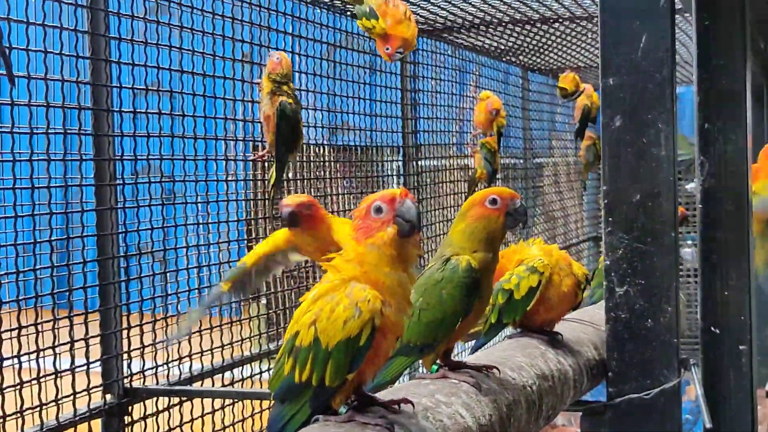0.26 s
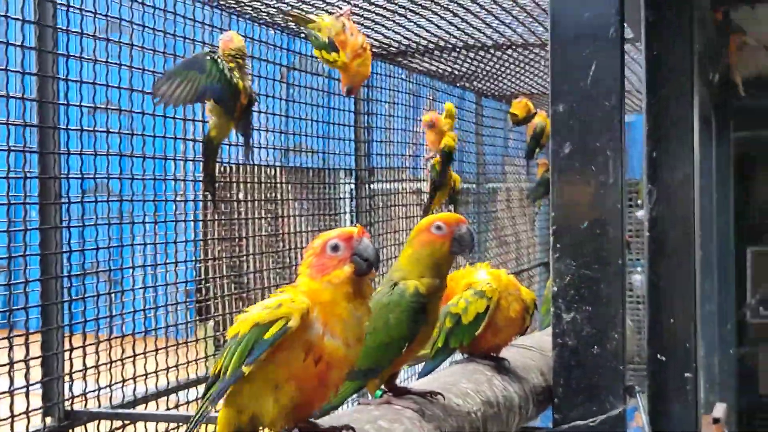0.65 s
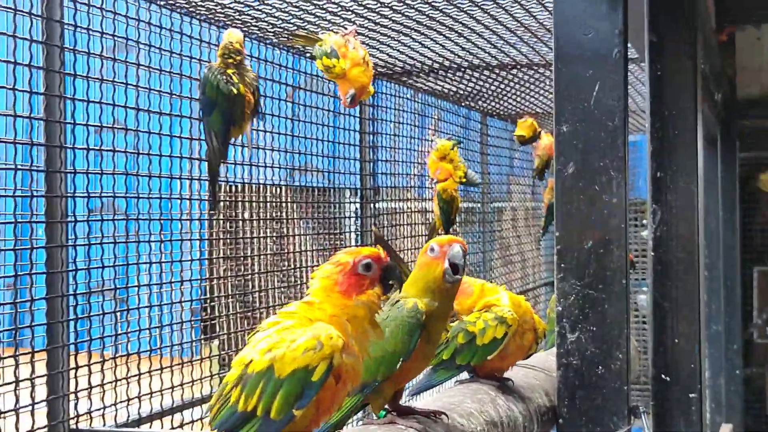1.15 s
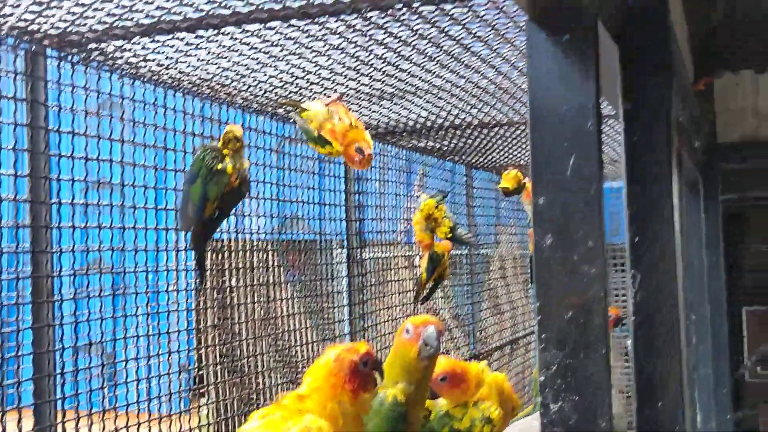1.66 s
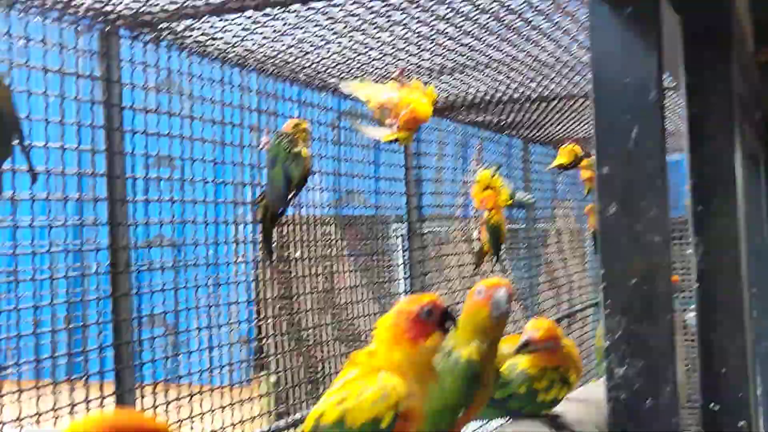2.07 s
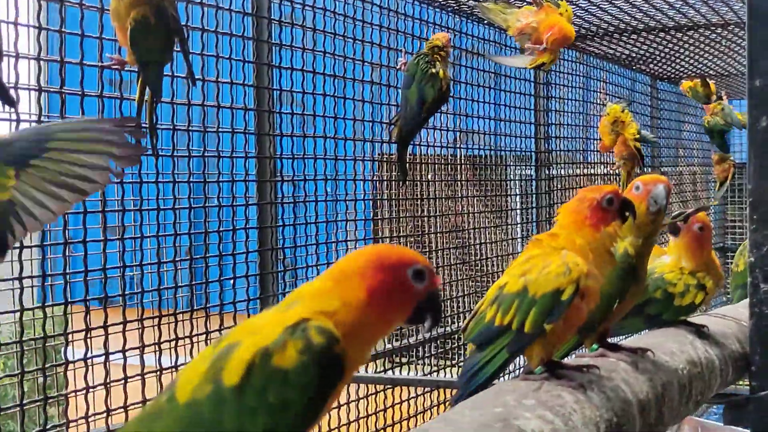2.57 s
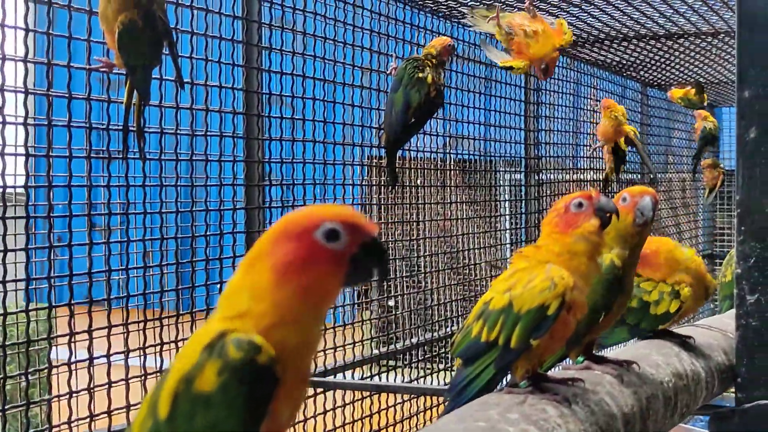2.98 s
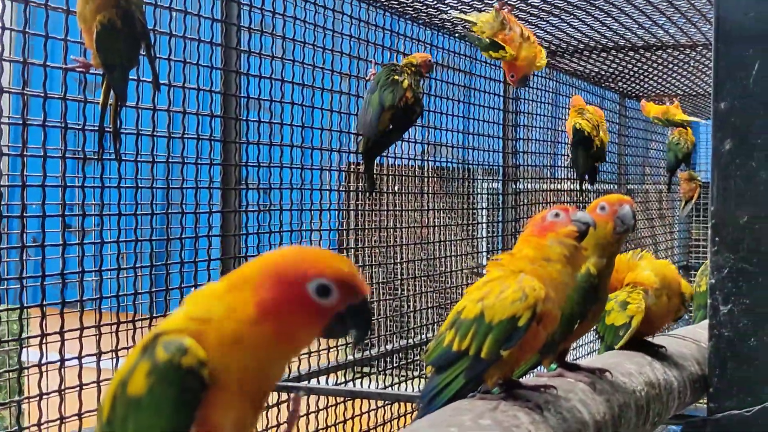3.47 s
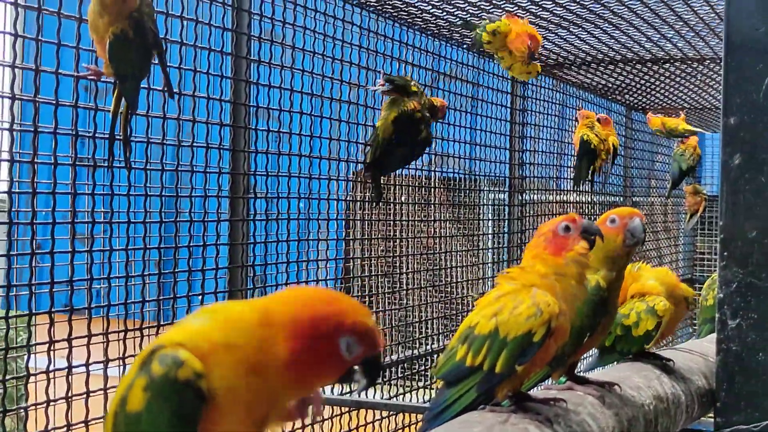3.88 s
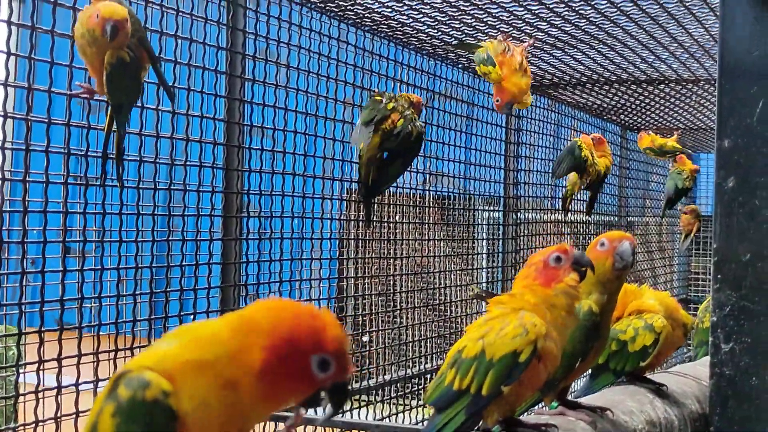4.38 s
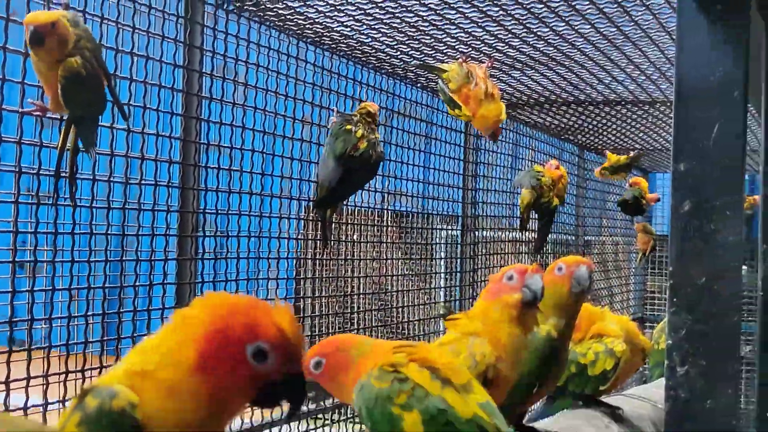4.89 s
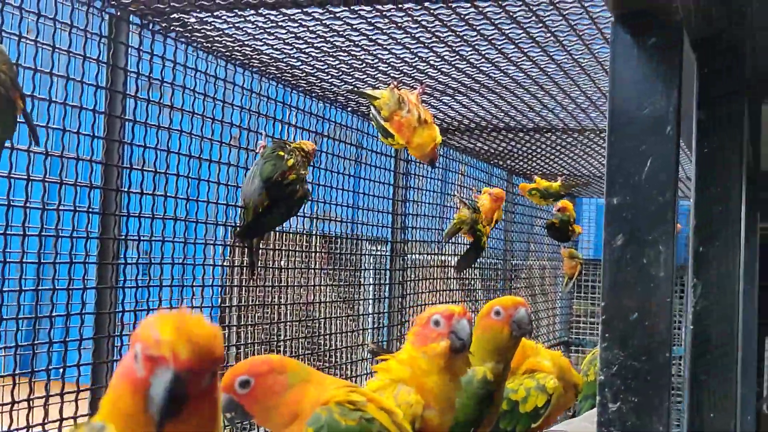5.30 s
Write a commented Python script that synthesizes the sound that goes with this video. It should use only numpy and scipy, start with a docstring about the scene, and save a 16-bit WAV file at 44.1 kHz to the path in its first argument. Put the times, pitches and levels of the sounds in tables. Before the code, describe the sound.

A flock of small parrots screeches shrilly in an outdoor wire aviary, near and far calls overlapping, with dull knocks close to the microphone.

```python
"""An outdoor wire-mesh aviary of small parrots: a low rush and the blurred calls of the far flock run throughout.
Hoarse squawks, so rough their harmonics nearly drown, come from mid-aviary; an early close yelp slides downward.
From half a second on, near and far birds screech: shrill harmonics, trilled and rasped, the far ones more echoed.
Dull knocks, damped low rings with a thud of noise, land by the left microphone port from 1.4 to 2.2 s.
A close, stuttering croak comes near the end; the recorder's limiter ducks the loudest sounds."""
import sys
import numpy as np
from scipy import signal
from scipy.fft import rfft, irfft, next_fast_len
from scipy.io import wavfile
from scipy.ndimage import uniform_filter1d, map_coordinates

SR = 44100
rng = np.random.default_rng(int(sys.argv[2]) if len(sys.argv) > 2 else 0)


def store_pcm(level_fs):
    """Save levels as 16-bit WAV."""
    pcm = np.round(np.clip(level_fs, -1, 1) * 32767).astype(np.int16)
    wavfile.write(sys.argv[1], SR, np.atleast_2d(pcm).T)


N = 244314
TOP_HZ = 15900  # upper band limit of harmonics and recorder
CLEAR_RASP = .2  # rasp of the yelp and the croak, 0-1


def amp(db):
    """Decibels to gain."""
    return 10 ** (np.asarray(db) / 20)


def unit(x):
    """Scale to rms 1."""
    return x / np.sqrt(np.mean(x ** 2) + 1e-20)


def along(points, hz):
    """Read (frequency [Hz], value) points on a log frequency axis."""
    f, v = np.transpose(points)
    return np.interp(np.log(np.abs(hz) + 1), np.log(f + 1), v)


def wobble(rate, size):
    """A smooth random curve through rate knots a second."""
    knots = rng.standard_normal(size=512)
    return map_coordinates(knots, [np.arange(size) * rate / SR], mode="mirror")


def filtered(x, gain):
    """Apply a gain that depends on frequency."""
    size = x.shape[-1]
    padded = next_fast_len(size + 4096)
    return irfft(rfft(x, padded) * gain(np.fft.rfftfreq(padded, 1 / SR)), padded)[..., :size]


def noise(spectrum, shape):
    """Noise of rms 1 with the given colour."""
    return unit(filtered(rng.standard_normal(shape), lambda hz: amp(along(spectrum, hz))))


def add(track, s, sound):
    """Mix a sound into the track at time s."""
    start = int(np.clip(s * SR, 0, N))
    part = sound[..., :N - start]
    track[:, start:start + part.shape[-1]] += part


def bow(length):
    """The rounded rise and fall of a short syllable."""
    return np.sqrt(np.sin(np.linspace(0, np.pi, int(length * SR))).clip(0))


# how long the aviary walls ring: (frequency [Hz], time to fall 60 dB [s])
WALL_DECAY = [(300, 0.14), (2000, 0.73), (6000, 0.53), (10000, 0.31), (15000, 0.31)]
WET_M = 1.42  # distance at which the echoes are as loud as the direct sound


def in_aviary(voice, metres, pan_db, early_db=1, early_t60=0.27, lead_per_db=1.07):
    """A bird heard at the two ports: direct sound, quick echoes off the frame and a tail from the walls."""
    hz, t, grains = signal.stft(rng.standard_normal((2, SR // 2)), SR, nperseg=256)
    walls = amp(-60 * t / along(WALL_DECAY, hz)[:, None])
    frame = amp(early_db - 60 * t / early_t60)
    tail = signal.istft(grains * (walls + frame), SR, nperseg=256)[1]
    side = np.array([[pan_db / 2], [-pan_db / 2]])
    wet = metres / WET_M
    # the louder port is also the nearer one and hears the bird slightly earlier
    lead = np.clip(lead_per_db * side, -16, 16)  # samples
    direct = np.sinc(np.arange(tail.shape[1]) - 20 + lead)
    # distance shifts the balance towards the echoes, not the overall level
    response = (direct + wet * tail / np.linalg.norm(tail[0])) * amp(side) / np.hypot(1, wet)
    return signal.fftconvolve(voice[None], response, axes=1)


def syrinx(pitch, rasp, colour, jitter=0.0408, jitter_hz=1000, flutter=1.0, flutter_hz=330,
           split=0.98, undertone=0.62, hiss=0.28, count=8):
    """Harmonics of the membranes; rasp jitters the cycles, makes alternate ones unequal and adds turbulence."""
    size = len(pitch)
    phase = 2 * np.pi * np.cumsum(pitch * (1 + jitter * rasp * wobble(jitter_hz, size))) / SR
    tone = np.zeros(size)
    for k in range(1, count + 1):
        # irregular flutter widens every harmonic into a band
        flicker = wobble(flutter_hz, size) + 1j * wobble(flutter_hz, size)
        shake = 1 + flutter * rasp * flicker / 2 ** .5
        partial = np.real(shake * np.exp(1j * (k * phase + rng.uniform(0, 2 * np.pi))))
        tone += amp(colour(k * pitch)) * (k * pitch < TOP_HZ) * partial
    tone = unit(tone)
    # period doubling puts bands halfway between the harmonics, strongest just above the fundamental
    halves = split * tone * np.cos(phase / 2) + undertone * np.cos(phase + phase / 2)
    rough = halves * wobble(374.1, size)
    breath = rng.standard_normal(SR // 2)[:size]
    air = hiss * unit(filtered(breath, lambda hz: amp(colour(hz))))
    rasping = filtered(rough + air, lambda hz: 1 / (1 + (2500 / (hz + 1)) ** 4))  # mostly above 2500 Hz
    return unit(tone + rasp * rasping)


# relative strength of a harmonic in screeches, squawks and far calls: (frequency [Hz], level [dB])
CALL_THROAT = [(1200, -6), (2000, -3), (3000, 0.5), (4100, 1), (5000, 2), (5900, 4.5), (6800, 1.5),
               (8200, -3.5), (9700, -7.5), (11000, -14), (12500, -19.5), (15500, -17)]
SOFT_DB, FORCEFUL_DB = -24.5, -9.5  # call levels between which force grows from 0 to 1
# each pair runs from a soft call to a forceful one
SWELL_S, TRILL_DEPTH, EDGE_DB = (0.024, 0.007), (0.706, 1), (0.5, 6)
# full pitch range of a trill cycle; loudness swing either way, both at trill depth 1
TRILL_HZ, TRILL_OCTAVES, THROB_DB = 66.3, .16, 5.5
LEAD_S, LEAD_DB, LEAD_OCTAVES = .025, -19.5, .3  # the hoarse rising note that opens a call
SCOOP_OCTAVES, SCOOP_S, SAG_OCTAVES_PER_S = .34, .007, 0.395
DROOP_OCTAVES, DROOP_S, RELEASE_S = 0.276, .009, 0.01
EDGE_RASP = 0.44  # extra rasp at both ends of a call


def call(length, pitch_hz, db, rasp, shrill_db):
    """A hoarse lead-in, a scoop to pitch, a sagging trill and a droop; force hardens onset and deepens trill."""
    t = np.arange(-LEAD_S, length, 1 / SR)
    force = np.clip((db - SOFT_DB) / (FORCEFUL_DB - SOFT_DB), 0, 1)
    swell_s, trill, edge_db = (soft + force * (hard - soft)
                               for soft, hard in (SWELL_S, TRILL_DEPTH, EDGE_DB))
    lead = np.clip(-t / LEAD_S, 0, 1)
    opening = np.exp(-t.clip(0) / SCOOP_S)
    closing = np.exp((t - length) / DROOP_S)
    # every trill cycle starts low and loud, then climbs as it fades; the trill calms as the call ends
    trill_rate = TRILL_HZ * (1 + .07 * wobble(36.54, len(t))) * (t > 0)
    cycle = (np.cumsum(trill_rate) / SR) % 1
    ramp = trill * uniform_filter1d(cycle - .5, size=110) * (1 - closing)
    arch = SAG_OCTAVES_PER_S * (length / 2 - t)
    arch -= LEAD_OCTAVES * lead + SCOOP_OCTAVES * opening + DROOP_OCTAVES * closing
    octaves = arch + TRILL_OCTAVES * ramp + 0.01354 * wobble(119.45, len(t))
    # a shrill call gathers its energy in the throat's main resonance; force adds a harsh top
    focus = [(2400, -0.85), (4200, -0.68), (5800, -0.1), (6500, -0.47), (8200, -0.44)]
    harsh = [(9500, 0.53), (12000, 0.47)]

    def colour(hz):
        return along(CALL_THROAT, hz) + shrill_db * along(focus, hz) + edge_db * along(harsh, hz)

    voice = syrinx(pitch_hz * 2 ** octaves, rasp + EDGE_RASP * (opening + closing), colour)
    attack = np.maximum(np.clip(t / swell_s, 0, 1) ** .58, amp(LEAD_DB) * (1 - lead) ** .5)
    effort = attack * np.clip((length - t) / RELEASE_S, 0, 1) ** .5
    return amp(db) * effort * unit(voice * amp(-2 * THROB_DB * ramp))


# relative colour of the outdoor rush: (frequency [Hz], density [dB per Hz])
RUSH_COLOUR = [(26, -62), (45, -26), (129, -0.5), (232, -1), (264, 1), (384, -5.5), (463, -3.5),
               (534, -5.5), (644, -9.5), (1110, -18.5), (1400, -22), (1820, -62), (3080, -120)]
RUSH_DB = -41.5  # mean level ahead of the ports


def rush(apart=0.78):
    """A low outdoor rush of coloured noise, partly different at the two ports."""
    shared = noise(RUSH_COLOUR, N)
    separate = noise(RUSH_COLOUR, (2, N))
    return unit(shared + apart * separate) * amp(RUSH_DB + wobble(8.9, N))


# level of single calls at the far end, ahead of aviary and ports: (time [s], level [dB])
FLOCK_LEVEL = [(0, -31.5), (.25, -37.5), (1, -36.5), (1.9, -41.5), (2.4, -40.5), (3.3, -39), (3.7, -36),
               (4.1, -41), (4.6, -35), (5.5, -41.5)]
# relative colour of the din: (frequency [Hz], density [dB per Hz])
DIN_COLOUR = [(400, -16), (900, -5.5), (1500, 1), (2000, 2), (2600, 0.5), (3300, 0), (4100, -1.5),
              (5000, -3), (6100, -4.5), (7200, -6.5), (9500, -13.5), (11500, -18), (15500, -29)]
FLOCK_CALLS_PER_S, FLOCK_HZ, FLOCK_CALL_S, FLOCK_M = 7, 2103, 0.11, 2.4


def far_flock(din_db=-5.5, rasp=0.33, spread_octaves=.08, shrill_db=1, pan_db=0.0):
    """Birds at the far end call at random over the din of the rest, blurred into wavering noise."""
    times, level_db = np.transpose(FLOCK_LEVEL)
    swell_db = np.interp(np.arange(N) / SR, times, level_db) + din_db + 3.2 * wobble(7, N)
    track = amp(swell_db) * noise(DIN_COLOUR, (2, N))
    for k in range(int(FLOCK_CALLS_PER_S * N / SR)):
        late, high, long, side = rng.uniform(-1.1, 1, 4)
        s = (k + late / 2) / FLOCK_CALLS_PER_S
        length = FLOCK_CALL_S * 2 ** (long / 2)
        pitch_hz = FLOCK_HZ * 2 ** (spread_octaves * high)
        voice = call(length, pitch_hz, np.interp(s, times, level_db), rasp, shrill_db)
        add(track, s, in_aviary(voice, FLOCK_M, pan_db + 3 * side))
    return track


# hoarse squawks from mid-aviary, levels ahead of aviary and ports:
# (time [s], length [s], pitch [Hz], level [dB])
SQUAWK_CALLS = [(0.089, 0.065, 2095, -34), (0.264, 0.097, 1745, -25.5), (.439, 0.023, 2050, -20.5),
                (3.163, .12, 2320, -34.5), (3.391, 0.075, 2100, -35), (3.774, 0.055, 1750, -30),
                (3.98, 0.094, 2170, -29), (4.666, 0.068, 1888, -25), (4.878, 0.059, 1770, -27.5),
                (5.217, 0.085, 1740, -34), (5.458, .12, 1934, -24.5)]
SQUAWK_M, SQUAWK_RASP, SQUAWK_SHRILL_DB, SQUAWK_PAN_DB = 2.17, 0.73, -2, 1.5


def squawks():
    """The screeching voice with so much rasp that its harmonics nearly drown."""
    track = np.zeros((2, N))
    for s, length, pitch_hz, db in SQUAWK_CALLS:
        voice = call(length, pitch_hz, db, SQUAWK_RASP, SQUAWK_SHRILL_DB)
        add(track, s - LEAD_S, in_aviary(voice, SQUAWK_M, SQUAWK_PAN_DB))
    return track


# syllables of a yelp that drops into a lower register, levels before the fade:
# (time [s], length [s], mid pitch [Hz], level [dB])
YELP_SYLLABLES = [(0.149, 0.0047, 2600, -13), (0.155, .049, 1660, -17), (0.2032, 0.015, 1387, -20)]
# relative strength of a yelp harmonic: (frequency [Hz], level [dB])
YELP_COLOUR = [(1300, 13), (1700, 4), (2700, 19), (3400, 11), (4600, 0), (6300, -9), (9500, -8),
               (11500, -21), (15500, -25)]
YELP_SAG_OCTAVES_PER_S, YELP_FADE_S = 4.3, 0.048


def yelp():
    """A close bird's clearer, lower cry; each syllable slides down and fades."""
    track = np.zeros((2, N))
    for s, length, pitch_hz, db in YELP_SYLLABLES:
        effort = bow(length)
        t = np.arange(len(effort)) / SR - length / 2
        pitch = pitch_hz * 2 ** (-YELP_SAG_OCTAVES_PER_S * t) * (1 + 0.0216 * wobble(226, len(t)))
        voice = syrinx(pitch, rasp=CLEAR_RASP, colour=lambda hz: along(YELP_COLOUR, hz))
        cry = amp(db) * effort * np.exp(-t / YELP_FADE_S) * voice
        add(track, s, in_aviary(cry, metres=0.26, pan_db=6.0))
    return track


# shrill screeches, levels ahead of aviary and ports; shrillness is weighted by frequency, + pan is left:
# (time [s], length [s], pitch [Hz], level [dB], distance [m], base rasp [0-1], shrillness [dB],
#  left-right [dB])
SCREECH_CALLS = [ (0.476, 0.07, 2073, -21, 0.28, 0, -18, 3.5), (0.631, .12, 2072, -20, 3.4, 0.43, -1, 2),
                 (1.0768, .2, 2039, -12.5, 0.74, 0.2, 10, 2.5),
                 (1.4253, 0.17, 1984, -12, 1.16, 0.21, 9, -2), (1.657, .16, 2035, -24, 2.9, 0.57, -9.5, 1),
                 (2.097, .16, 2014, -20.5, 2.4, 0.34, -3, 1.5),
                 (2.467, 0.15, 2110, -19.5, 3.6, 0.39, 3.5, -1),
                 (2.644, 0.095, 2198, -22.5, 4.5, 0.57, 15, -1.5),
                 (2.7417, 0.091, 2199, -14.5, 0.77, .14, -7, 4),
                 (3.005, 0.13, 2081, -24.5, 2.1, 0.33, 12, 2), (3.27, 0.11, 1700, -28.5, 1.7, 0.5, 10, 2.5),
                 (3.567, 0.083, 2113, -25.5, 2, 0.71, -1, 2.5), (3.813, 0.13, 2125, -21, 4, 0.52, -1, 2.5),
                 (4.069, .15, 2035, -19, 5, 0.24, -5, 0), (4.217, .15, 2031, -21, 3, 0.64, -5, 1.5),
                 (4.39, 0.099, 2067, -16.5, .6, 0.13, 1, 2.5), (5.017, 0.08, 2170, -30, 3.6, 0.24, 9, 5.5),
                 ]


def screeches():
    """Loud, trilled calls; the farther the bird, the more echo the microphone hears."""
    track = np.zeros((2, N))
    for s, length, pitch_hz, db, metres, rasp, shrill_db, pan_db in SCREECH_CALLS:
        voice = call(length, pitch_hz, db, rasp, shrill_db)
        add(track, s - LEAD_S, in_aviary(voice, metres, pan_db))
    return track


# dull knocks, level ahead of the ports: (time [s], level [dB], time to fall 60 dB [s])
KNOCK_HITS = [(1.364, 0.5, 0.041), (1.395, -14, 0.1), (1.446, 4.5, 0.012), (1.466, 6, 0.012),
              (1.575, -1, 0.025), (1.592, 3.5, 0.031), (1.623, -12, 0.022), (2.163, -19, 0.023)]
# ringing of the knocked body: (frequency [Hz], relative level [dB], decay [multiple of the knock's])
BODY_MODES = [(120, -10, 1.2), (262, -1.5, .9), (207, -8.5, 2.6)]
# relative colour of the thud: (frequency [Hz], density [dB per Hz])
THUD_COLOUR = [(18, -44), (30, -10), (256, -0.5), (447, -8), (562, -6.5), (964, -22), (1100, -18.5),
               (1500, -23), (1950, -58), (3300, -120)]


def knocks(thud_db=-4, attack_s=.0015, pan_db=17):
    """Dull bumps next to the left port: a damped low ring and a thud of noise."""
    track = np.zeros((2, N))
    t = np.arange(SR // 6) / SR
    for s, db, t60 in KNOCK_HITS:
        ring = sum(amp(mode_db - 60 * t / (t60 * life)) * np.sin(2 * np.pi * hz * t)
                   for hz, mode_db, life in BODY_MODES)
        thud = amp(thud_db - 60 * t / t60) * noise(THUD_COLOUR, (2, len(t)))
        attack = 1 - np.exp(-t / attack_s)
        add(track, s, amp(db) * (ring + thud) * attack * amp([[0], [-pan_db]]))
    return track


# relative strength of a croak harmonic: (frequency [Hz], level [dB])
CROAK_COLOUR = [(1400, -11), (2750, -6), (4100, 1), (5300, 7), (6900, -6), (8100, 0.5), (9600, -13),
                (12000, -22)]
CROAK_S, CROAK_GAP_S, CROAK_DB = 5.3215, .0152, -25  # gap runs from onset to onset
CROAK_FIRST_S, CROAK_GROWTH_S = .0042, 0.0048  # syllables lengthen until they run together


def croak(pitch_hz=1380, arch=0.27, count=5):
    """A close bird stutters short, low syllables, each arching in pitch."""
    track = np.zeros((2, N))
    for k in range(count):
        effort = bow(CROAK_FIRST_S + k * CROAK_GROWTH_S)
        pitch = pitch_hz * (1 + arch * (effort - 1))
        voice = syrinx(pitch, rasp=CLEAR_RASP, colour=lambda hz: along(CROAK_COLOUR, hz), count=11)
        syllable = amp(CROAK_DB) * effort * voice
        add(track, CROAK_S + k * CROAK_GAP_S, in_aviary(syllable, metres=0.24, pan_db=3.0))
    return track


def scene():
    """All sources as they reach the two ports."""
    return rush() + far_flock() + squawks() + yelp() + screeches() + knocks() + croak()


LIMIT_DB, RECOVERY_DB_PER_S = -12, 73


def limited(x):
    """The gain drops when the louder port passes the limit, then recovers at a steady rate."""
    power = np.abs(uniform_filter1d(x ** 2, size=1320)).max(axis=0)  # over 30 ms
    level_db = 10 * np.log10(power + 1e-12)
    recovery = RECOVERY_DB_PER_S * np.arange(N) / SR
    cut_db = np.maximum.accumulate((level_db - LIMIT_DB).clip(0) + recovery) - recovery
    # each gain change eases in over the following 15 ms
    return x * amp(-uniform_filter1d(cut_db, size=661, origin=330))


# colour of the two microphone ports: (frequency [Hz], left level [dB], right level [dB])
PORT_COLOUR = [(150, -2, -2), (940, 4.8, 7), (1930, 1.7, 5.5), (4430, 1.8, 6.5), (6170, 0, 8.5),
               (7130, 7.5, 8), (8660, 10.5, 0), (9160, 18, 1), (11900, 4.5, -1), (14900, -0.5, 5)]
CEILING = .78  # peaks round off towards this amplitude, ahead of the final filter


def record(dry, low_cut_hz=42):
    """Ports colour the sound; the recorder limits, rounds peaks, cuts deep bass and ends the band steeply."""
    ports = np.array(PORT_COLOUR)
    left, right = ports[:, [0, 1]], ports[:, [0, 2]]
    coloured = filtered(dry, lambda hz: amp([along(left, hz), along(right, hz)]))
    held = limited(coloured)
    rounded = held / (1 + np.abs(held / CEILING) ** 10) ** (1 / 10)
    return filtered(rounded, lambda hz: (hz < TOP_HZ) * hz ** 2 / np.hypot(hz ** 2, low_cut_hz ** 2))


dry = scene()
out = record(dry)
store_pcm(out)
```